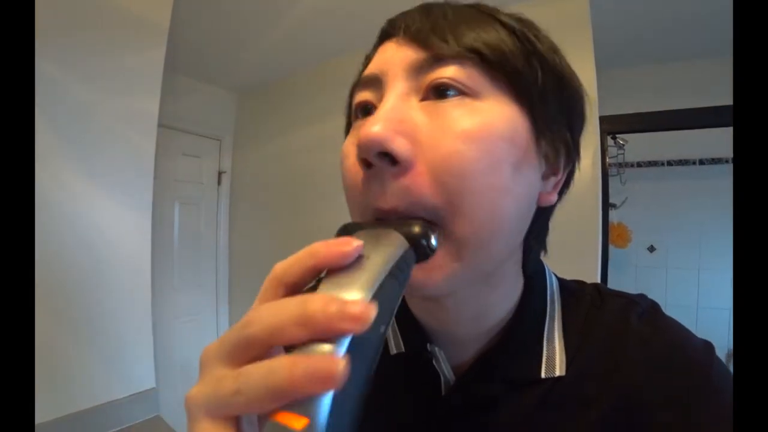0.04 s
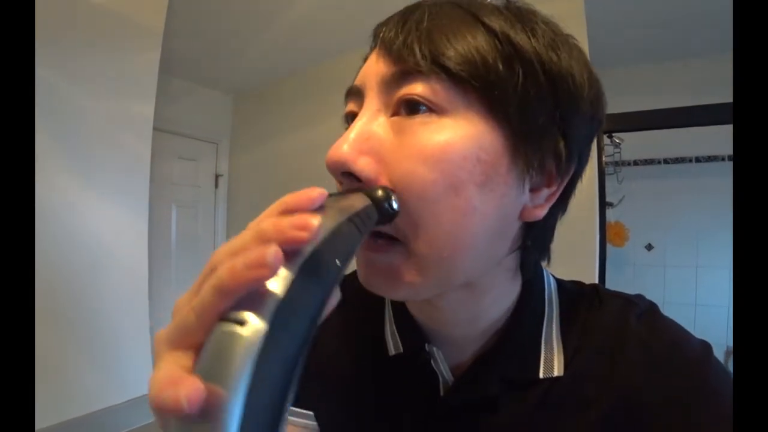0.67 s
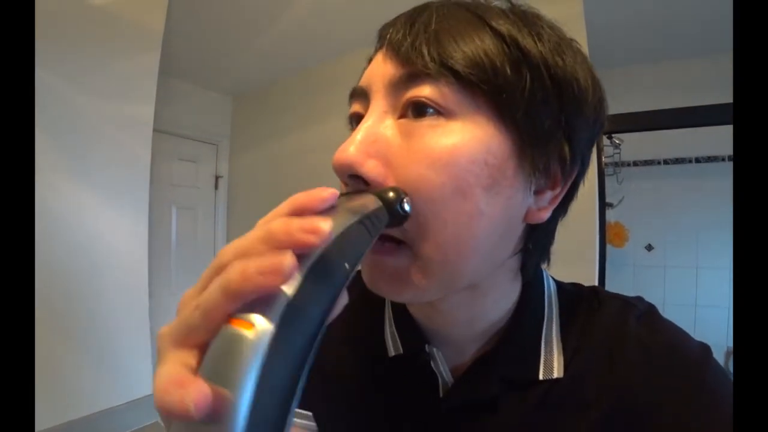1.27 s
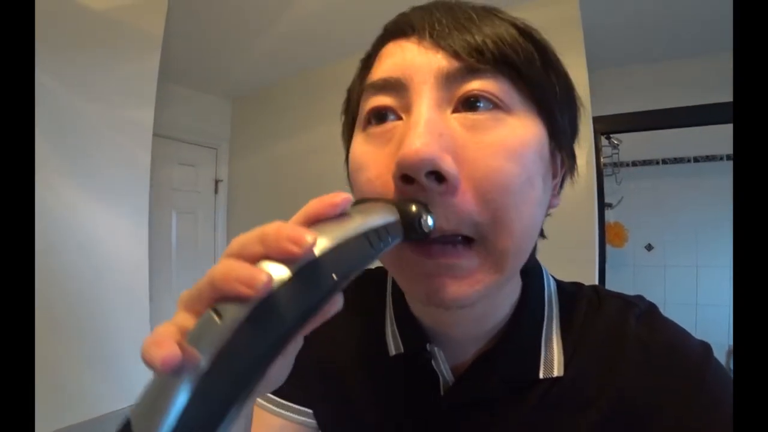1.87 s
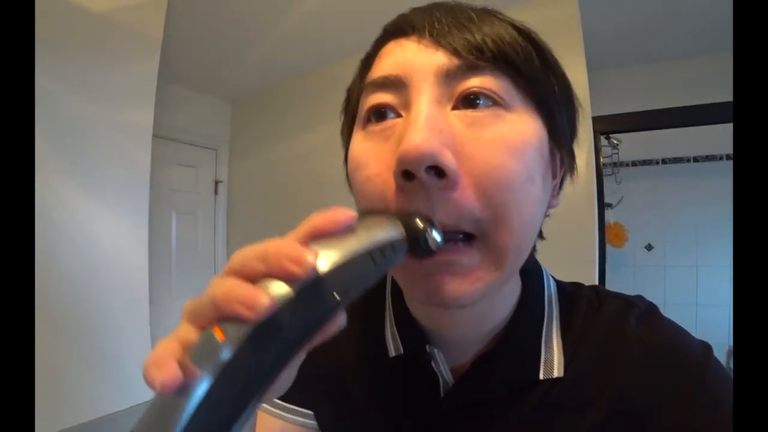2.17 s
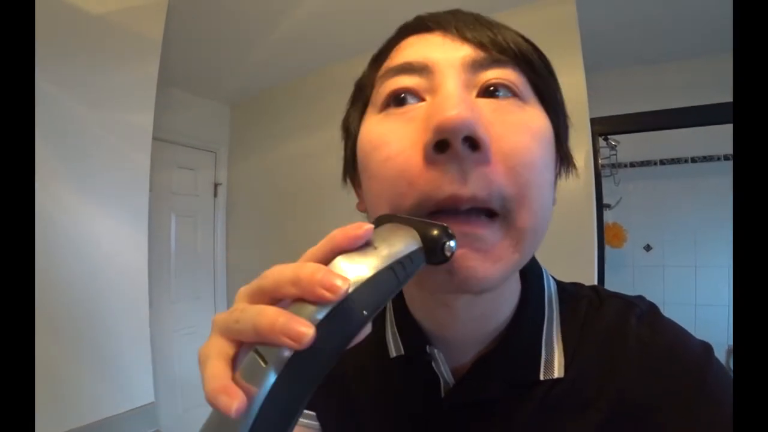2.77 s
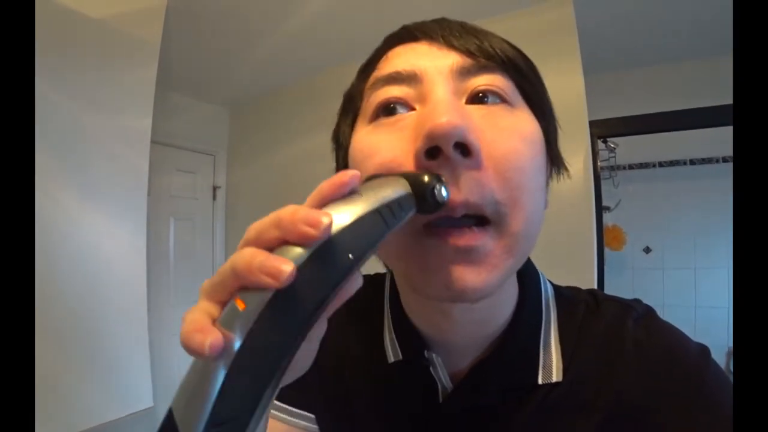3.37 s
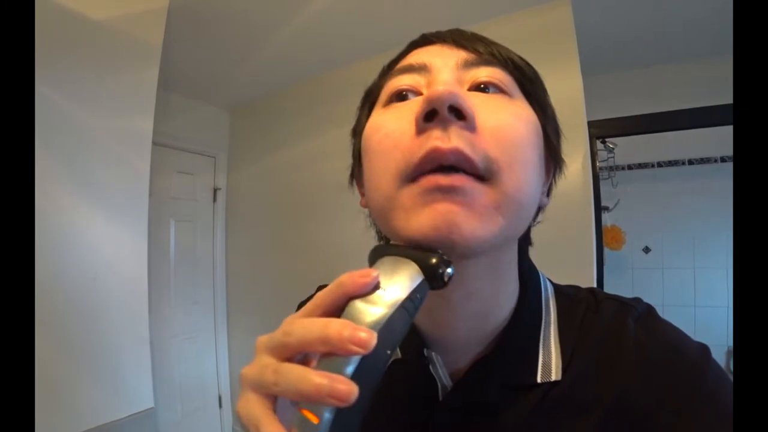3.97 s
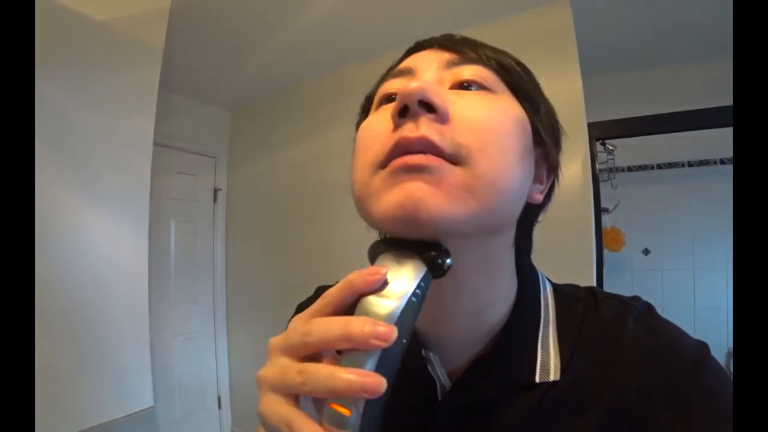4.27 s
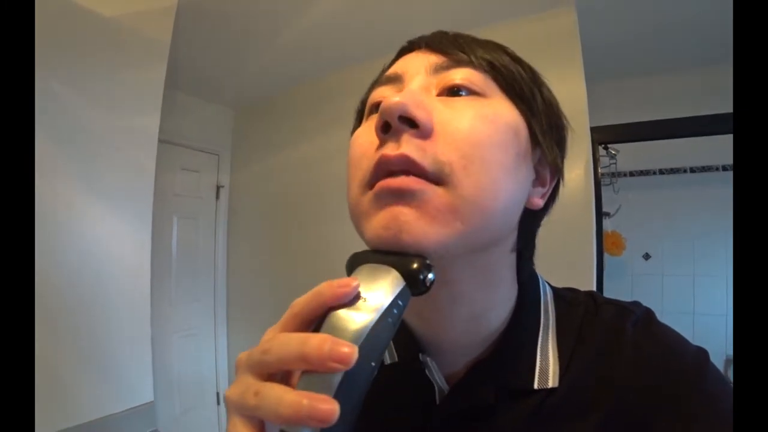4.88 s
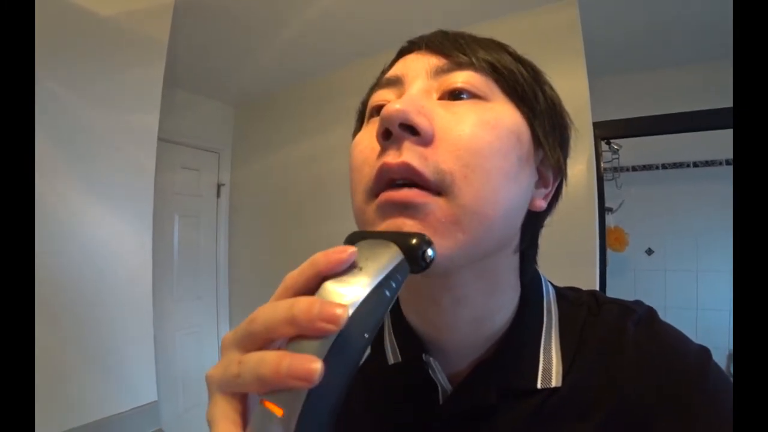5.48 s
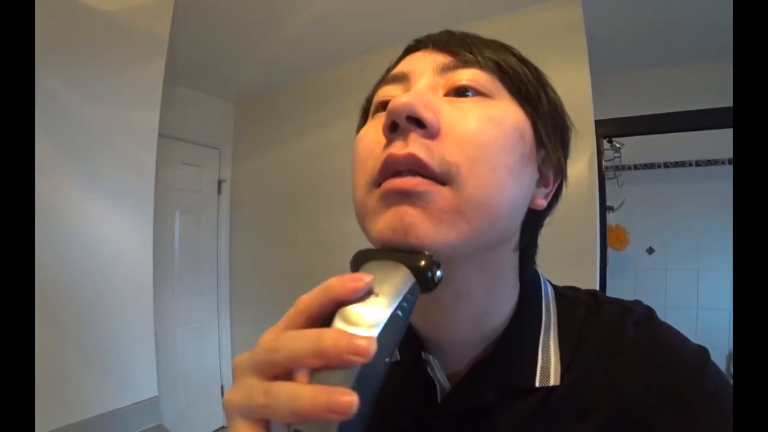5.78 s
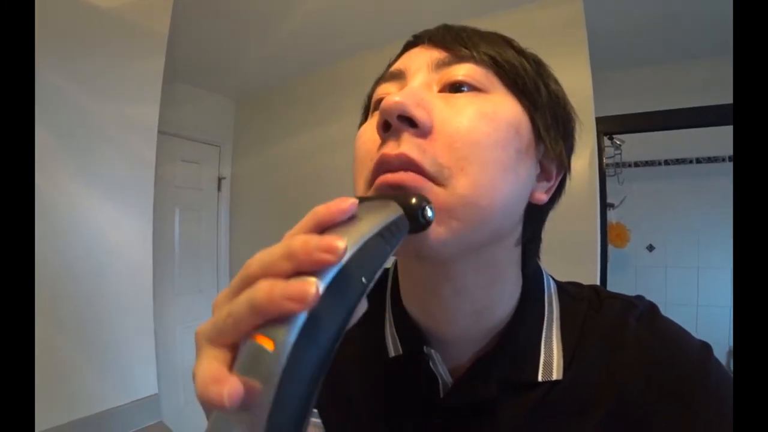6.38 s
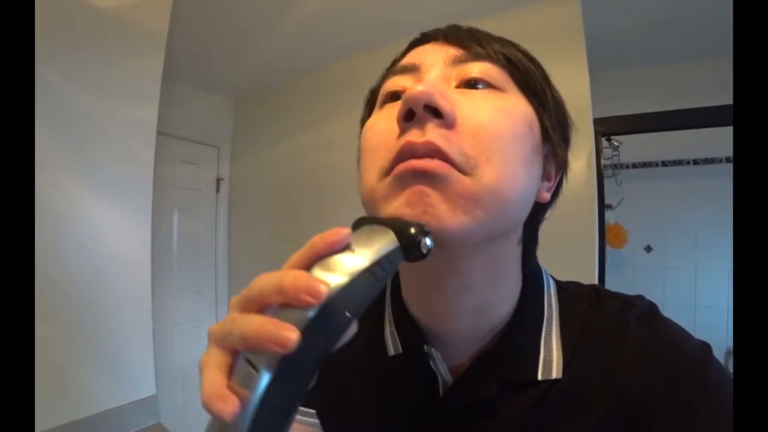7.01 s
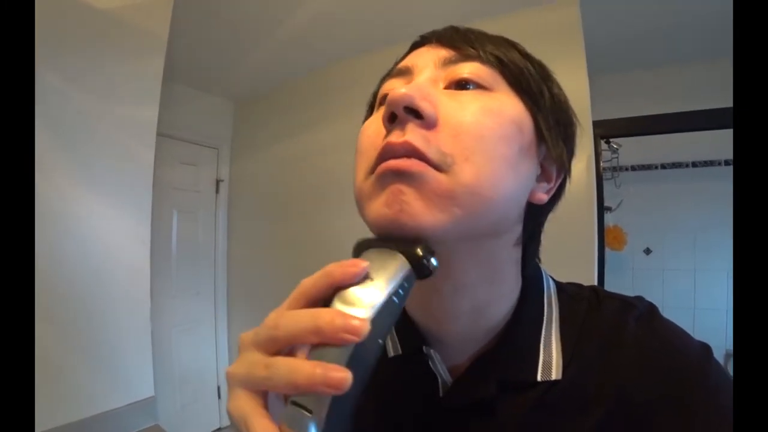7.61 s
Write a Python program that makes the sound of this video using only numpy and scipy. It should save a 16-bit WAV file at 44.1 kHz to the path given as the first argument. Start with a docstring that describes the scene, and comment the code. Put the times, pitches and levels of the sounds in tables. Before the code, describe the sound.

An electric beard trimmer buzzes from start to finish, close to the microphone, with a low hum beneath it and the short echo of a small tiled bathroom. From about 0.5 to 3.6 seconds it makes repeated strokes around the lip, strongest near 0.8, 1.2, 2 and 3.4 seconds. Each slows the motor slightly and adds a rattle and a scratchy, high crackle of cut stubble. The steel blade rings thinly on and off, and single hairs snap crisply. Around 4 seconds come a few soft, low bumps at the microphone. From 4.2 to 5.1 seconds the buzz is steadier and hissier as the trimmer moves under the chin. Tiny snaps cluster between 4.8 and 5.5 seconds. Further raspy, rattling strokes peak near 5.5, 6.3 and 7.2 seconds. The trimmer is still running at the end, near 7.7 seconds, over a faint room rumble.

```python
"""In a small tiled bathroom, an electric beard trimmer is stroked over lip, chin and throat.
Its drive knocks the blade to and fro about 108 times a second: a clean buzz in the air, a rattle under
load. Each stroke slows the motor and crackles with cut hairs; each press on the jaw brings out a rattle.
The steel blade rings and hisses once in each turn. Under it all lie a low hum, a few soft bumps at the
microphone and the quiet rumble of the room."""
import sys
import numpy as np
from scipy import signal
from scipy.fft import rfft, irfft, next_fast_len
from scipy.io import wavfile
from scipy.ndimage import uniform_filter1d, map_coordinates

SR = 44100
rng = np.random.default_rng(int(sys.argv[2]) if len(sys.argv) > 2 else 0)


def transcribe(u):
    """Save the signal u as a 16-bit wav file named by the first command-line argument.

    u: samples, shape (n,) or (channels, n), limited to [-1, 1]; the rate is SR.
    q: integer samples, one column per channel.
    """
    v = np.clip(np.atleast_2d(u).T, -1, 1)
    q = np.round(v * 32767).astype(np.int16)
    wavfile.write(sys.argv[1], SR, q)


N = 337365

# How the trimmer is held. Each row: time in seconds, share lifted off the skin, share under the chin.
# Shares run from 0 to 1; the rest lies flat on the face.
HOLD = [(0, 1, 0.7), (.13, 1, 0.3), (.2, 0.3, 0.25), (.45, 0.46, 0.55), (.6, 0.3, 0.24), (1.42, 0.7, 0.2),
        (1.54, 1, 0.03), (1.72, 1, 0.14), (1.9, 0.25, 0.15), (4.08, 0.12, 0), (4.26, 0.35, 0.94),
        (4.4, 0.08, 1), (5.08, 0, 1), (5.22, 0.05, 0.18), (6.56, 0.05, 0), (6.64, 0.18, 0),
        (7.0, 0.07, 0.16), (7.08, 0.03, 0.03)]
# The knocks of the drive. Each row: place within one turn from 0 to 1, strength.
KNOCKS = [(0.08, 0.7), (.32, 0.5), (0.55, 0.75), (.68, 0.45), (0.84, 0.35)]


def housing(turns):
    """The knocks make the shell buzz at multiples of the motor speed; the hold sets their balance."""
    # One table for each hold. Each row: multiple of the motor speed, relative level in dB.
    in_air = [(8, -14), (9, -13), (10, -8), (11, -4), (12, 2), (13, -6.5), (14, -12), (15, -5), (16, -5),
              (17, 3), (18, -4), (19, -4), (20, -16), (21, -3), (22, -13), (23, -4), (24, -6), (25, -2.5),
              (26, -7), (27, -10), (28, -13)]
    under_chin = [(8, -26), (9, -17), (10, -14), (11, -18), (12, -9), (13, -9), (14, -8), (15, 2),
                  (16, -1.5), (17, -1.5), (18, -12), (19, -12), (20, -9), (21, -11), (22, -9), (23, -12),
                  (24, -4), (25, -3), (26, -13), (27, -9), (28, -23)]
    on_face = [(8, -20), (9, -16.5), (10, -15.5), (11, -15), (12, -10.5), (13, -0.5), (14, -10), (15, -4),
               (16, -5.5), (17, -3.5), (18, -1.5), (19, -6.5), (20, -4.5), (21, -11), (22, -9.5),
               (23, -10.5), (24, -7), (25, -5), (26, -9), (27, -12), (28, -17)]
    lifted, chin = np.clip(curves(HOLD), 0, 1)
    face = np.clip(1 - lifted - chin, 0, 1)
    shares = np.array([lifted, chin, face])
    gains = amp([[db for _, db in hold] for hold in (in_air, under_chin, on_face)])
    gains = gains / np.linalg.norm(gains, axis=1, keepdims=True)
    buzz = np.zeros(N)
    for (multiple, _), sizes in zip(in_air, gains.T):
        timing = np.angle(sum(size * np.exp(-2j * np.pi * multiple * phase) for phase, size in KNOCKS))
        grip = amp((2 + 1.6 * face) * wobble(9))  # sliding skin damps each overtone differently
        shell_shift = 1.1 * rng.standard_normal()  # the shell's resonances shift each wave, in radians
        tone = np.cos(2 * np.pi * multiple * turns + timing + shell_shift)
        buzz += np.sqrt(sizes ** 2 @ shares) * grip * tone
    return unit(buzz)


def rattle(turns):
    """Under load the knocks lose their timing and the joints chafe."""
    # The rattle's tone colour. Each row: frequency in Hz, relative level in dB.
    colour = [(150, -27.5), (400, -31), (750, -18), (1050, -8), (1250, -6), (1400, 1), (1520, -7),
              (1700, 1.5), (1900, 2.5), (2300, -4), (2700, -4), (3200, -8.5), (3750, -5.5), (4200, -8),
              (5000, -4), (9000, -45)]
    knocks = sum(size * strikes(turns, phase, play=0.026, scatter_db=5) for phase, size in KNOCKS)
    chafing = 1.1 * rng.standard_normal(N)
    return patchy(coloured(unit(knocks) + chafing, colour), depth_db=1.1)


def strokes():
    """Strokes load the motor. Gives the speed lost in Hz, the comb's bite (0-1) and the cutting gain."""
    # Each row: start, deepest point and end in seconds, speed lost in Hz, cutting level in relative dB.
    stubble_strokes = [(0.143, 0.28, 0.65, 0.16, -41), (0.467, 0.766, 0.88, 4.98, -34.5),
                       (0.819, 0.915, 1.22, 2.6, -36.5), (1.029, 1.24, 1.56, 3.2, -36),
                       (1.778, 2.02, 2.25, 2.94, -32.5), (2.319, 2.429, 2.72, 2.24, -36),
                       (2.66, 2.726, 2.98, 1.14, -34.5), (2.701, 3.353, 3.62, 3.44, -36.5),
                       (3.432, 3.877, 4.16, 1.31, -42.5), (5.11, 5.537, 5.82, 4.1, -36),
                       (5.6, 6.008, 6.1, 1.08, -44), (5.988, 6.269, 6.96, 3.32, -35),
                       (6.96, 7.158, 7.56, 2.1, -38), (7.35, 7.633, 7.4, 0.42, -37)]
    full_cut_depth, full_bite_hz = 0.59, 2.18
    t = np.arange(N) / SR
    sag_hz, cutting = np.zeros((2, N))
    for start, deepest, end, drop_hz, db in stubble_strokes:
        depth = np.sin(np.pi / 2 * np.interp(t, [start, deepest, end], [0, 1, 0])) ** 1.61
        sag_hz = sag_hz + drop_hz * depth
        cutting = together(cutting, amp(db) * np.minimum(depth / full_cut_depth, 1))
    return sag_hz, np.clip(sag_hz / full_bite_hz, 0, 1), cutting


def cutter(turns, load, lifted):
    """The teeth cross twice a turn: an even buzz when free, a crackle of cut hairs under load."""
    # The crackle's tone colour. Each row: frequency in Hz, relative level in dB.
    colour = [(900, -26), (2500, -10), (3150, -23), (3750, 3.5), (4200, -1), (4700, 1), (5600, 7.5),
              (6100, 6), (6500, 7), (7000, 2.5), (8200, 4), (8800, 4.5), (10200, 3), (11200, -5)]
    hairs_per_s = 3000
    crossing = .5 + gate(turns, 0.29, sharp=0.81) + 1.6 * gate(turns, 0.65, sharp=0.93)
    sizes = amp(2 * np.minimum(rng.exponential(size=N), 3.2))
    hairs = (rng.random(N) < hairs_per_s / SR) * rng.standard_normal(N) * sizes
    scrape = (unit(hairs) + rng.standard_normal(N)) * crossing * amp(wobble(170) + 0.41 * wobble(30))
    crackle = patchy(coloured(scrape, colour), depth_db=1.3)
    cut_share = np.clip(1.7 * load + .14 - .11 * lifted, .03, .95)
    flutter = amp(-1 + wobble(60))  # the blade's travel varies a little from turn to turn
    return np.sqrt(1 - cut_share) * flutter * free_blade(turns, lifted) + np.sqrt(cut_share) * crackle


def free_blade(turns, lifted, size=2048, overtones=102):
    """The unloaded blade repeats the same ringing knocks every turn; skin damps their lowest band."""
    # The free blade's tone colour. Each row: frequency in Hz, relative level in dB.
    colour = [(2400, -27), (3100, -0.5), (3700, 4), (4150, -1.5), (4400, 7), (4650, 1), (5300, 2.5),
              (6300, 3.5), (7500, 1.5), (11000, 0)]
    within = np.arange(size) / size
    knocks = sum(force * np.exp(-((within - phase) % 1) / 0.1) for phase, force in KNOCKS)
    spectrum = rfft(knocks * rng.standard_normal(size))[:overtones]
    one_turn = irfft(spectrum / np.abs(spectrum) * amp(2.55 * rng.standard_normal(overtones)), size)
    buzz = coloured(np.interp(turns, within, one_turn, period=1), colour)
    lowest = filtered(buzz, lambda hz: np.exp(-((hz - 3650) / 550) ** 2))
    return buzz + (0.48 * lifted - .45) * lowest


def blade_ring(turns, speed_hz, load):
    """The blade catches its guide and chirps once a turn: evenly when free, raggedly when loaded."""
    # Each row: start and length in seconds, relative level in dB, pitch in Hz, share of slap from 0 to 1.
    catches = [(-.02, 0.07, -32, 5440, 0), (0.062, 0.092, -28.5, 5350, 0.24),
               (.46, 0.32, -28.5, 5410, 0.46), (.862, 0.033, -24, 4100, 0.14), (.91, .12, -33, 4000, 0),
               (.93, 0.49, -29.5, 5370, 0.06), (1.412, 0.17, -28.5, 5360, 0), (1.572, 0.1, -34, 5450, 0.03),
               (1.753, 0.072, -30.5, 5550, 0.2), (1.872, 0.21, -37, 5200, 0.32),
               (2.2, 0.15, -34.5, 5370, 0.17), (2.344, 0.14, -27.5, 5420, 0.1), (2.73, 0.21, -27, 5810, 1),
               (3.3, 0.088, -28.5, 5580, 0.79), (3.497, 0.3725, -36, 3616, 0.02),
               (3.512, 0.39, -30.5, 5400, 0), (3.809, 0.055, -25.5, 5500, 0.7),
               (4.125, 0.063, -33, 5393, 0.17), (5.5, 0.15, -25, 5644, 0.72), (6.161, 0.15, -25, 5660, 0.7),
               (6.475, 0.071, -27, 5560, 0.5), (7.082, 0.17, -30, 5665, 0.78)]
    from_peak_s = ((turns + .3) % 1 - .5) / speed_hz
    window = gate(turns, .2, sharp=2.6)
    # Random drift smears the ragged note: mostly near its pitch, a little further out.
    stray = wobble(560) + 1j * wobble(560) + 0.4 * (wobble(1500) + 1j * wobble(1500))
    stray = unit((window + 0.15) * np.abs(stray)) * np.exp(1j * np.angle(stray))
    bent_s = np.cumsum(1 + .012 * wobble(25)) / SR  # changing pressure bends the note
    rough = np.clip(2.4 * load - .15, .01, .9)
    # The blade also slaps its guide once a turn: a sharp, broad tick.
    contact = gate(turns, .18, sharp=16) * rng.standard_normal(N) * amp(2 * wobble(110))
    slap = coloured(contact, [(4200, -24), (5300, 0), (6400, 0), (7000, -13), (8000, -7), (9500, -20)])
    # Under load it chafes in the guide.
    rub = (window + .5) * rng.standard_normal(N)
    chafe = coloured(rub, [(4100, -17), (4800, -1), (5500, -1), (6400, -8), (7100, -14)])
    out = amp(-32.5) * load * chafe
    for start, length, db, ring_hz, slap_share in catches:
        gain = amp(db) * swell(start, length)
        on = np.flatnonzero(gain)
        even = unit(window[on] * np.sin(2 * np.pi * ring_hz * from_peak_s[on]))
        ragged = unit(np.real(stray[on] * np.exp(2j * np.pi * ring_hz * bent_s[on])))
        chirp = np.sqrt(1 - rough[on]) * even + np.sqrt(rough[on]) * ragged
        out[on] += gain[on] * (np.sqrt(1 - slap_share) * chirp + np.sqrt(slap_share) * slap[on])
    return out


def comb_hiss(turns, chin, bite):
    """Steel slides on steel and the comb hisses, louder on skin, under the chin and in stubble."""
    # The comb skims over skin. Each row: start in seconds, length in seconds, relative level in dB.
    skims = [(0.082, 0.36, -39), (0.692, 0.28, -34.5), (1.22, 0.16, -32), (2, 0.14, -31),
             (2.69, 0.46, -35.5), (3.651, 0.071, -31.5), (4.042, 0.29, -33), (5.323, 0.24, -29),
             (5.497, 0.561, -37.5), (6.677, 0.29, -35.5), (6.709, 0.15, -31), (7.303, 0.44, -37.5)]
    # The steel comb's resonances. Each row: pitch in Hz, width in Hz, relative level in dB.
    resonances = [(10650, 330, -13), (10040, 600, 12), (10430, 420, 5)]
    skimming = [amp(db) * swell(start, length) for start, length, db in skims]
    gain = together(*skimming, amp(-39.5), amp(-35) * chin, amp(-39) * bite) * amp(2.5 * wobble(8.5))
    rub = (0.45 + gate(turns, 0.25, sharp=3.8)) * rng.standard_normal(N) * amp(1.1 * wobble(90))
    return gain * ringing(rub, resonances)


def hair_snaps():
    """A thick hair crunches between the teeth, and again more weakly on the blade's way back."""
    # Each row: time in seconds, relative level in dB.
    snaps = [(0.599, -9), (0.64, 0), (0.66, 2), (.73, -3), (0.8882, 0), (1.085, 0.5), (3.0509, -0.5),
             (3.0957, 3), (3.239, -2), (3.349, -12), (3.6181, -3), (3.741, -2), (3.817, -3), (3.828, -8),
             (4.0314, -0.5), (4.0915, -1.5), (4.834, -6), (4.917, -2.5), (5.0532, -4), (5.1123, -4),
             (5.158, -4.5), (5.195, 2), (5.317, -13), (5.33, -3), (5.34, -5), (5.36, -2), (5.3723, 1.5),
             (5.443, 0.5), (5.464, 0), (6.0126, -1.5), (6.164, -9), (6.481, -7)]
    colour = [(300, -54), (1500, -20), (4200, -8.5), (6200, 1), (7500, -1.5), (8600, -0.5), (10300, 2)]
    t = np.arange(SR // 20) / SR
    crunch = 1.35 * (1 - np.exp(-t / .0004)) * amp(-60 * t / 0.012)
    way_back = 0.3 * (t > .0046) * amp(-60 * np.abs(t - .0046) / 0.035)
    times, db = np.transpose(snaps)
    bursts = signal.fftconvolve(pulses(np.round(times * SR), amp(db)), crunch + way_back)[:N]
    return amp(-7.5) * bursts * coloured(rng.standard_normal(N), colour)


def hum(turns, low_gain_db):
    """The unbalanced drive shakes the body once a turn; its overtones come and go with skin contact."""
    # Each row: time in seconds, level of the lowest note in dB.
    levels = [(0, -46.5), (.3, -53), (.9, -51), (1.7, -49), (2.4, -46.5), (3.7, -49), (4.3, -49.5),
              (5.2, -48.5), (6.2, -48.5), (7.65, -47.5)]
    # Each row: multiple of the motor speed, relative dB on the lip and on the jaw,
    # how strongly it follows the skin's muffling.
    overtones = [(2, -17, -17.5, 0.49), (3, -9, -9, 0.86), (4, -15, -14, 1.85), (5, -9.5, -4.5, 0.79),
                 (6, -13, -12, 1.1), (7, -14.5, -14, 1.6)]
    level_db, = curves(levels)
    jaw = np.interp(np.arange(N) / SR, (3.795, 3.66), [0, 1])  # 0 on the lip, 1 on the jaw
    upper = np.zeros(N)
    for multiple, lip_db, jaw_db, follows in overtones:
        contact_db = follows * (low_gain_db + 2.4 * wobble(8))
        gain = amp(lip_db + (jaw_db - lip_db) * jaw + contact_db + 1.5 * wobble(30))
        upper += gain * np.sin(2 * np.pi * (multiple * turns + rng.random() + .03 * wobble(40)))
    return amp(level_db + 0.48 * wobble(11)) * np.sin(2 * np.pi * turns) + amp(level_db) * upper


def bathroom(x):
    """The tiles echo differently to the left and right, the treble dying first."""
    # Each row: frequency in Hz, seconds the echo takes to fade by 60 dB.
    fade_times = [(200, 1), (2000, 0.91), (10000, 0.18)]
    hz, t, noise = signal.stft(rng.standard_normal((2, SR // 2)), SR, nperseg=256)
    tail = signal.istft(noise * amp(-60 * t / along(fade_times, hz)[:, None]), SR, nperseg=256)[1]
    tail = np.pad(tail / np.linalg.norm(tail[0]), ((0, 0), (SR // 300, 0)))
    return signal.fftconvolve(x[None], tail, axes=1)[:, :N]


def microphone_pair(x):
    """The trimmer reaches the two microphone openings at different levels and slightly out of step."""
    # Each row: frequency in Hz, left level minus right level in dB.
    balance = [(110, 11), (600, -5.5), (1120, -1.5), (1900, 1.5), (3000, 3), (6000, -1.5), (11000, -1)]
    sides = np.array([[.5], [-.5]])
    skew = lambda hz: 0.37 * np.exp(-(np.log((hz + 1) / 2500) / 0.75) ** 2)  # radians
    return filtered(x, lambda hz: amp(along(balance, hz) * sides) * np.exp(1j * skew(hz) * sides))


def bumps():
    """Soft bumps at the microphone: brief swells of very low rumble."""
    # Each row: time in seconds, level in dB.
    soft_bumps = [(3.966, -46), (3.995, -41), (4.04, -49), (4.14, -47), (4.18, -51)]
    colour = [(8, -24), (25, 2), (55, -1), (110, -15), (300, -38), (1000, -76)]
    t = np.arange(N) / SR
    gain = sum(amp(db) * np.exp(-((t - at) / 0.014) ** 2) for at, db in soft_bumps)
    return gain * coloured(rng.standard_normal(N), colour)


def room_rumble():
    """The room's quiet rumble, half of it shared by left and right."""
    # Each row: frequency in Hz, relative level in dB.
    colour = [(5, -18), (22, -9), (45, -12), (80, -10), (200, -13.5), (500, -16.5), (10000, -26)]
    return amp(-51.5) * coloured(rng.standard_normal(N) + rng.standard_normal((2, N)), colour)


def amp(db):
    """Turn decibels into a gain."""
    return 10 ** (np.asarray(db) / 20)


def unit(x):
    """Scale to an average power of 1."""
    return x / np.sqrt(np.mean(x ** 2) + 1e-20)


def together(*gains):
    """Unrelated sounds add in power."""
    return np.sqrt(sum(g ** 2 for g in gains))


def along(points, hz):
    """Read between (Hz, value) points on a logarithmic frequency scale."""
    f, v = np.transpose(points)
    return np.interp(np.log(hz + 1), np.log(f + 1), v)


def curves(rows):
    """One value per sample for each column after the time."""
    times, *columns = np.transpose(rows)
    return [np.interp(np.arange(N) / SR, times, column) for column in columns]


def wobble(rate):
    """A smooth curve through rate random values a second."""
    return map_coordinates(rng.standard_normal(int(N * rate / SR) + 4), [np.arange(N) * rate / SR])


def swell(start, length, attack_s=0.019, release_s=0.033):
    """One touch rises from 0 to 1, holds and lets go."""
    t = np.arange(N) / SR
    return np.clip(np.minimum((t - start) / attack_s, (start + length - t) / release_s) + .5, 0, 1)


def gate(turns, phase, sharp):
    """A smooth window that opens once a turn."""
    return np.exp(sharp * (np.cos(2 * np.pi * (turns - phase)) - 1))


def pulses(at, sizes):
    """Clean clicks at positions that may fall between samples."""
    taps = np.floor(at).astype(int)[:, None] + np.arange(-7, 9)
    away = taps - at[:, None]
    shape = np.sinc(away) * np.cos(np.pi * away / 16) ** 2
    inside = (taps >= 0) & (taps < N)
    return np.bincount(taps[inside], (shape * sizes[:, None])[inside], N)


def strikes(turns, phase, play, scatter_db):
    """One click a turn at the given phase, early or late by about the play (in turns)."""
    due = np.arange(int(turns[-1])) + phase
    chance = rng.standard_normal((SR // 10, 2))[:len(due)]
    at = np.interp(due + play * chance[:, 0], turns, np.arange(N), left=-SR, right=-SR)
    return pulses(at, amp(scatter_db * chance[:, 1]))


def filtered(x, response):
    """Multiply each frequency in x by response(hz)."""
    size = 2 * next_fast_len(N // 2 + SR // 4)
    return irfft(rfft(x, size) * response(np.fft.rfftfreq(size, 1 / SR)), size)[..., :N]


def coloured(x, points):
    """Shape x by (Hz, dB) points, ringing only after each sound, never before; power 1."""
    def response(hz):
        cepstrum = irfft(np.log(amp(along(points, hz))))
        half = len(cepstrum) // 2
        return np.exp(rfft(np.r_[cepstrum[0], 2 * cepstrum[1:half], np.zeros(half)]))
    return unit(filtered(x, response))


def ringing(x, modes):
    """Pass x through steep-sided resonances; power 1."""
    def response(hz):
        return sum(amp(db) * (2j * hz * width / (pitch ** 2 - hz ** 2 + 2j * hz * width)) ** 2
                   for pitch, width, db in modes)
    return unit(filtered(x, response))


def patchy(x, depth_db):
    """Resonances come and go as the skin covers different parts of the comb."""
    spectra = signal.stft(x, nperseg=512)[2]
    patches = rng.standard_normal(spectra.shape)
    for _ in range(2):
        patches = uniform_filter1d(uniform_filter1d(patches, size=5, axis=0), size=16, axis=1)
    return unit(signal.istft(spectra * amp(depth_db * unit(patches)), nperseg=512)[1][:N])


def scene():
    """Strokes, presses and the hold drive all parts of the trimmer; the room surrounds it."""
    # The comb bears on the firm jaw. Each row: start in seconds, length in seconds, force from 0 to 1.
    presses = [(0.147, 0.3, 0.5), (.5, 0.063, 0.37), (0.854, 0.16, 0.84), (1.313, 0.1, 0.65),
               (1.687, 0.16, 0.42), (2.086, 0.12, 0.83), (2.244, 0.13, 0.43), (2.507, 0.12, 0.7),
               (2.687, 0.37, 0.54), (3.473, 0.11, 0.66), (3.571, 0.15, 0.58), (3.714, 0.22, 0.74),
               (3.933, 0.19, 0.54), (4.193, 0.091, 0.33), (4.389, 0.13, 0.34), (4.749, 0.071, 0.39),
               (4.9, 0.29, 0.34), (5.173, 0.2, 0.46), (5.389, 0.3, 0.9), (5.78, 0.26, 0.44),
               (6.2, 0.34, 0.65), (6.703, 0.12, 0.29), (7.076, 0.14, 0.67), (7.226, 0.23, 0.58),
               (7.569, 0.11, 0.75)]
    free_hz, slowing_hz_per_s = 109.45, .06
    sag_hz, bite, cutting = strokes()
    lifted, chin = np.clip(curves(HOLD), 0, 1)
    press = sum(force * swell(start, length) for start, length, force in presses)
    speed_hz = free_hz - slowing_hz_per_s * np.arange(N) / SR - sag_hz
    turns = np.cumsum(speed_hz + (0.0751 + 0.095 * bite) * wobble(22)) / SR  # motor turns so far

    buzz_gain = amp(-33.6 + 0.8 * lifted + 0.5 * chin + 1.8 * press - 1.05 * sag_hz)
    rattle_gain = together(amp(-47.3), amp(-35) * bite, amp(-31.5) * press)
    cut_gain = together(cutting * amp(1.2 * wobble(16)), amp(-41.5), amp(-39) * lifted, amp(-35.5) * press)
    load = 1 / (1 + (buzz_gain / rattle_gain) ** 2)  # near 0 running free, near 1 deep in stubble
    # Skin muffles the low notes; lifting off or pressing on the jaw opens them up.
    low_gain_db = -1.7 - 0.5 * bite - 3 * chin + 5 * lifted + 9 * press ** 2

    body = buzz_gain * housing(turns) + rattle_gain * rattle(turns)
    low_notes = filtered(body, lambda hz: 1 / (1 + (hz / 950) ** 6))
    body = body + (amp(low_gain_db) - 1) * low_notes
    head = amp(6.5) * cut_gain * cutter(turns, load, lifted)
    head += amp(-3.5) * blade_ring(turns, speed_hz, load) + comb_hiss(turns, chin, bite) + hair_snaps()
    echo = bathroom(amp(-11) * body + amp(-7) * head)
    trimmer = microphone_pair(amp(-2) * (body + head + echo))
    return trimmer + hum(turns, low_gain_db) + bumps() + room_rumble()


def record(dry, top_hz=11050):
    """The camera cuts off the highest treble."""
    return filtered(dry, lambda hz: np.clip((top_hz - hz) / 100 + .5, 0, 1))


dry = scene()
out = record(dry)
transcribe(out)
```